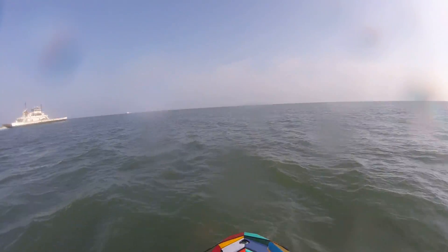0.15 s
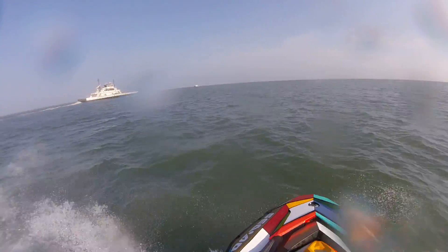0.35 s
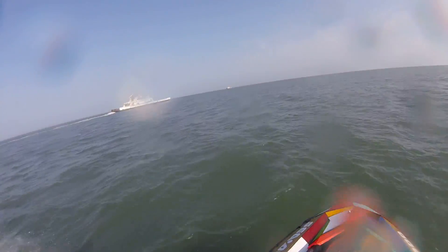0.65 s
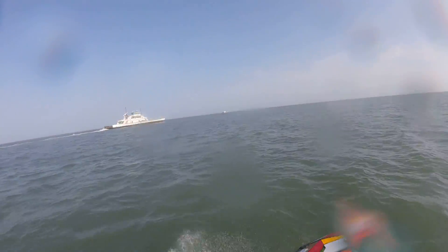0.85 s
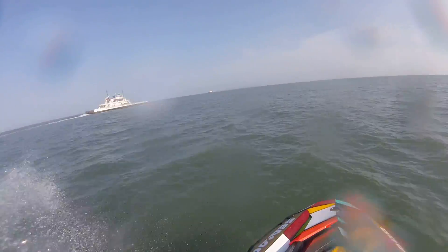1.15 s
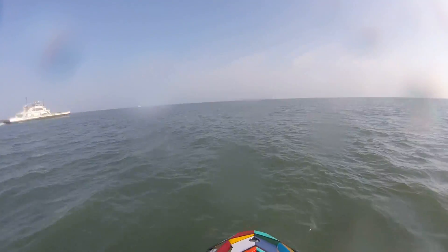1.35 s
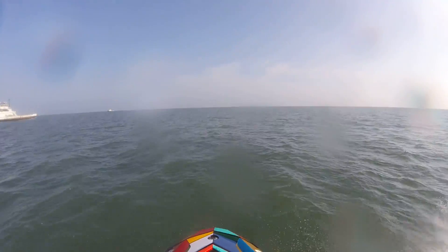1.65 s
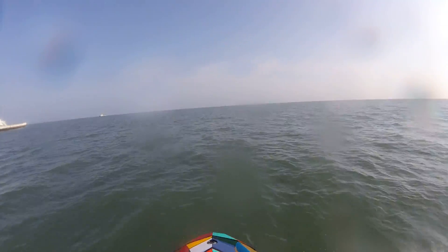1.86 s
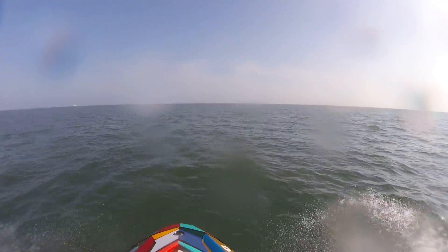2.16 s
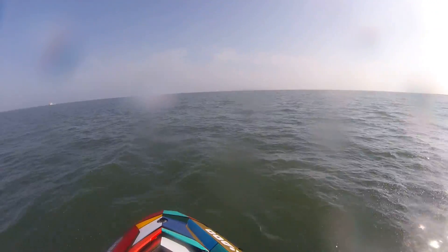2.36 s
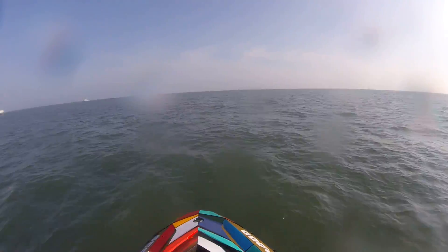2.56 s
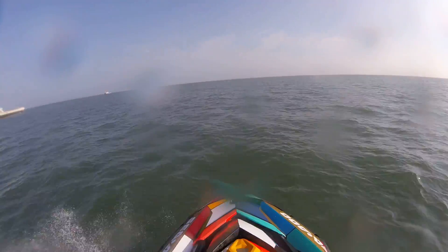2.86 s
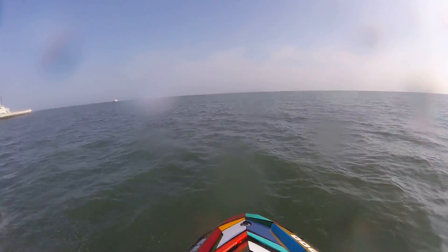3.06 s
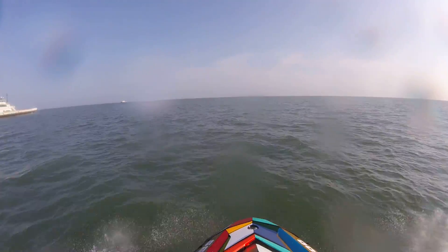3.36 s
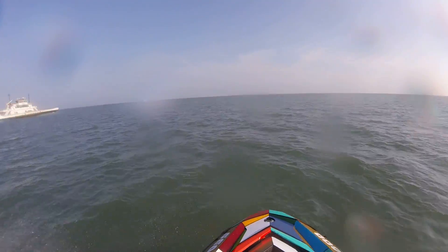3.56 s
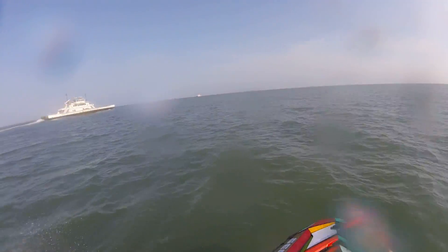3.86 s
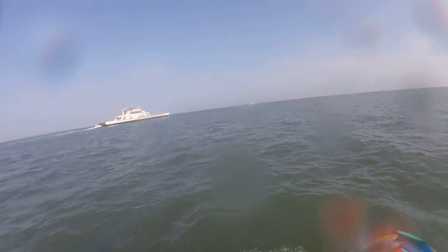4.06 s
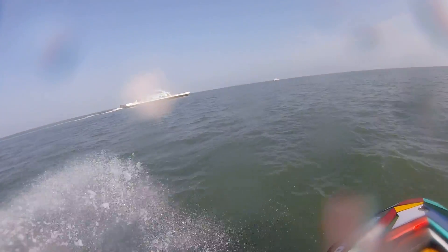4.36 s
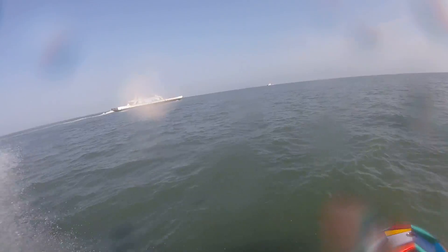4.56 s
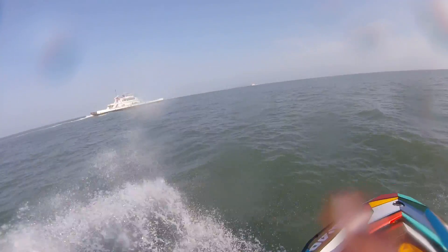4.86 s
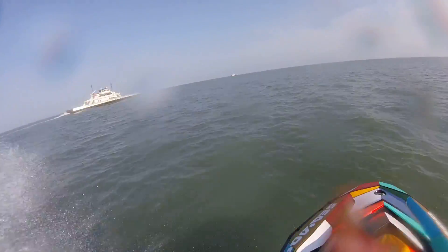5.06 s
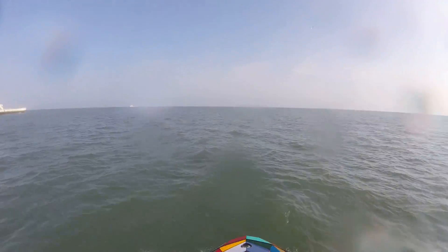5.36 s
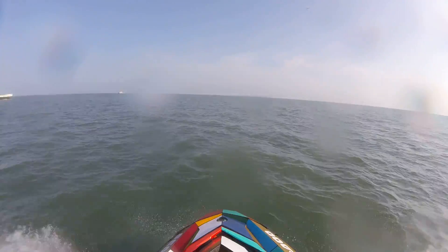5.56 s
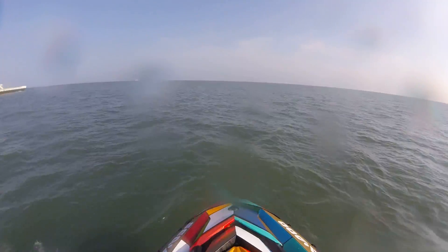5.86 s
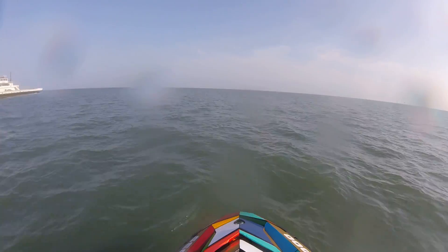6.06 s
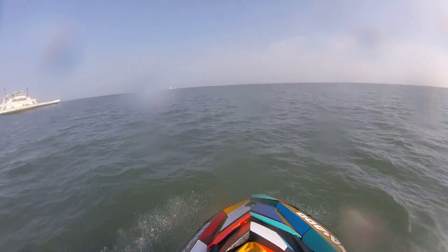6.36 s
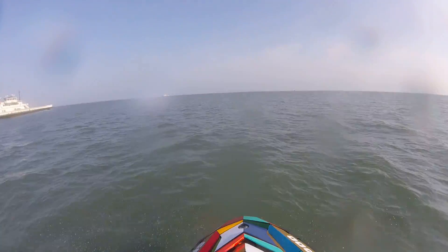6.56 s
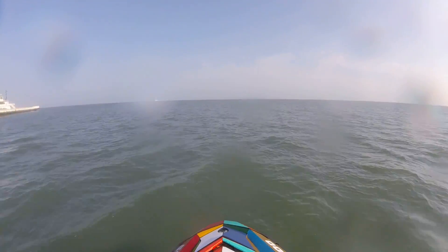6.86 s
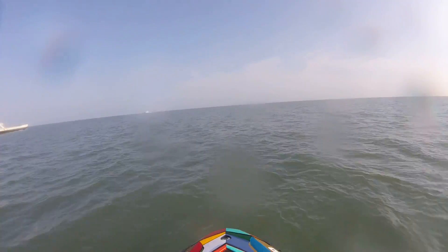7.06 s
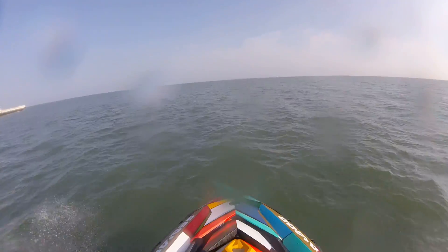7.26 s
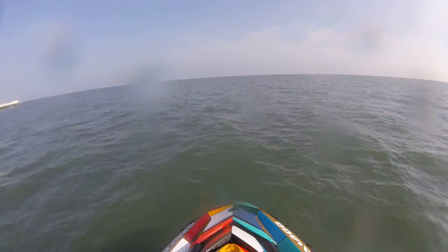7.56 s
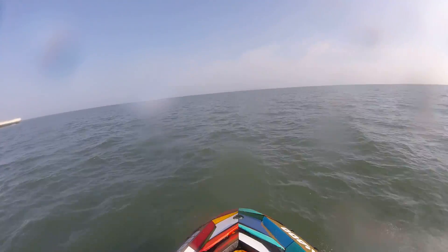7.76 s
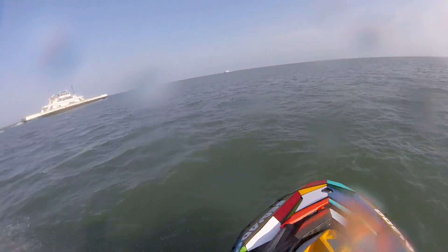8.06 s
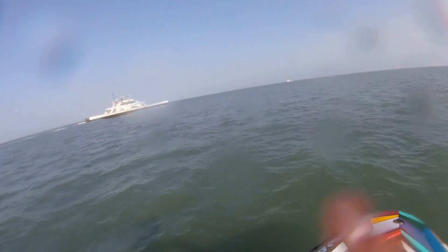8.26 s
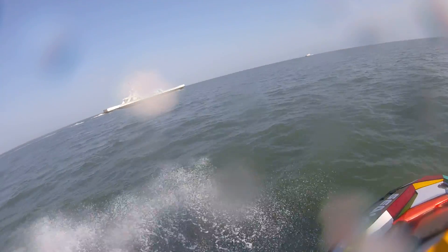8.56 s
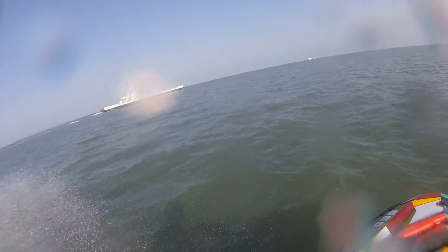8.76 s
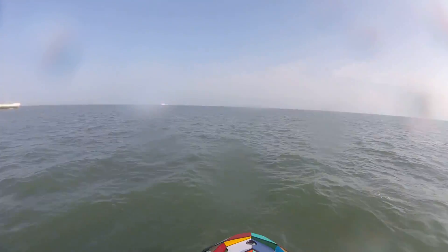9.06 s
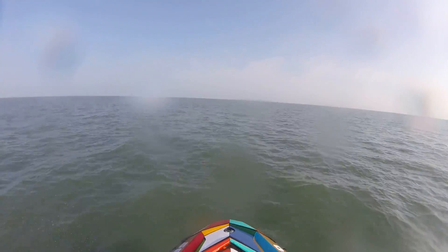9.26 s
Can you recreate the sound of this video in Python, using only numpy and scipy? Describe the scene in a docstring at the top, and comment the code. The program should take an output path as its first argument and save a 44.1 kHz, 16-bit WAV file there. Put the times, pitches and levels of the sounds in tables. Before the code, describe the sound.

A jet ski engine hums steadily across choppy water, with hissing spray, dull wave slaps and wind buffeting the microphone.

```python
"""A small jet boat crosses choppy water, heard from inside a sealed case whose cavity rings in the treble.
From the start a three-cylinder four-stroke engine hums through the rumbling hull, spray hisses and wind
buffets the case, flapping most in the first 1.6 s. At 4.7 s a wave slaps the hull; the engine then
speeds up to a peak at 7.5 s, through sheets of spray and a second slap at 6.3 s. It eases a little,
another sheet passes at 8.5 s, and a last, softer wave hits at 9 s."""
import sys
import numpy as np
from scipy import signal
from scipy.io import wavfile

SR = 44100
rng = np.random.default_rng(int(sys.argv[2]) if len(sys.argv) > 2 else 0)


def unload_audio(sound):
    """Save the sound as a 16-bit wav file, at the path given as the first command line argument."""
    columns = np.transpose(np.atleast_2d(sound))
    # keep every value between -1 and 1, then stretch to whole-number steps
    steps = np.round(np.clip(columns, -1, 1) * 32767)
    wavfile.write(sys.argv[1], SR, steps.astype(np.int16))


N = 415422

# Each row: time in seconds, four-stroke cycle rate in Hz, crank shake in dB, firing tone in dB,
# lift of the drone near 250 Hz in dB.
ENGINE_RUN = [(.05, 41.84, -37, -49, 1), (.12, 42.16, -30.5, -18, 2), (.27, 41.23, -48, -39, -4),
              (.39, 42.17, -27, -20, -1), (.46, 44.3, -34, -25.5, 0), (.71, 44.54, -26.5, -31.5, -1.5),
              (1.13, 44.44, -34, -29.5, 0), (1.42, 44.3, -24, -37, -0.5), (1.58, 43.02, -33, -34, -7),
              (1.78, 42.34, -24.5, -40, -1), (2.02, 42.93, -42, -37, -7), (2.28, 42.74, -30, -24, -4),
              (2.7, 42.93, -35, -35, 0.5), (3.1, 43.12, -25, -44, -1), (3.33, 43.63, -25.5, -23.5, -0.5),
              (3.67, 42.42, -33, -33, -1), (4.1, 43.17, -28, -27, -1), (4.25, 42.2, -30, -25.5, 3.5),
              (4.6, 42.28, -27.5, -24, -1), (4.75, 43, -30, -21, -1), (4.9, 43.76, -18, -20, 6),
              (5.09, 45.54, -21, -27.5, 0.5), (5.4, 45.65, -27, -26, 0.5), (5.58, 45.5, -23.5, -27, 0),
              (5.75, 45.6, -21, -27, 2), (6.1, 47.2, -20.5, -31, 1), (6.4, 46.51, -21, -29, -0.5),
              (6.51, 47.15, -23, -31, -3.5), (6.59, 48.3, -23, -31, -6), (6.72, 49.51, -22, -22.5, 6),
              (6.98, 48.88, -23.5, -21.5, 1), (7.5, 50.37, -21, -20.5, 5), (7.85, 49.7, -20.5, -22, 2.5),
              (8.22, 49.2, -22.5, -22.5, 2.5), (8.5, 48.1, -21, -29, -0.5), (9.0, 48.17, -21.5, -25.5, 1),
              (9.35, 47.8, -23, -26, 1)]
# Crank shake booming through the hull. Each row: peak time in seconds, lift in dB, rise and decay in s.
CRANK_BOOMS = [(.12, 16, 0.068, .06), (.39, 14, 0.03, .04), (.76, 11, 0.05, 0.13), (1.44, 3.5, 0.12, 0.052),
               (2.28, 8.5, 0.078, 0.034), (2.65, 10, .05, 0.052), (4.62, 14.5, 0.078, 0.075),
               (5.01, -7, .04, 0.035), (5.27, 16, 0.078, 0.091), (5.98, 1, 0.044, .05),
               (6.32, 1.5, 0.048, .05), (6.58, 11.5, 0.043, 0.053), (8.2, 9, 0.057, 0.028),
               (8.61, 3.5, 0.048, 0.057)]
# Exhaust hum near 180 Hz. Each row: time in seconds, level of order 4 in dB.
EXHAUST_HUM = [(0, -47), (.45, -29), (.6, -22), (.75, -39), (1.2, -27.5), (1.6, -42), (4.5, -36.5),
               (5.2, -24), (5.6, -31.5), (6.5, -34.5), (7.1, -33), (7.7, -33.5), (8.2, -28.5), (8.8, -26.5),
               (9.4, -36)]
# Slow, middle and fast cycle rate in Hz.
DRONE_RATES_HZ = [43, 46, 50]
# Drone over hull and exhaust resonances. Each row: order, level in dB at each of those three rates.
DRONE_ORDERS = [(5, -27.5, -27.5, -28), (6, -30, -32.5, -39.5)]
# Fading overtones. Each row: time in seconds, levels of orders 8, 9, 10 and 12 in dB.
OVERTONES = [(0.1, -40, -40, -35, -43), (0.4, -48, -50, -34.0, -41), (0.7, -46, -41, -42.5, -46),
             (1.0, -46.0, -41, -34.5, -52), (1.3, -41, -41, -40, -46), (1.6, -42, -55, -39.5, -46),
             (1.9, -53, -45, -38, -48), (2.2, -35, -47, -37.5, -43), (2.5, -55, -42, -41, -51),
             (2.8, -47, -55.0, -42, -45), (3.1, -42, -46, -36.5, -42), (3.4, -48.0, -40, -38, -44),
             (3.7, -42, -51, -37, -42), (4.0, -43, -52, -39.5, -44), (4.3, -38, -50, -34, -46.0),
             (4.6, -38, -45.0, -43.0, -53), (4.9, -58, -47, -40, -41), (5.2, -35, -35, -44, -39),
             (5.5, -35, -31, -36, -51), (5.8, -28, -40, -38.5, -40), (6.1, -37.5, -35, -40, -46),
             (6.4, -37.5, -34, -42.0, -44), (6.7, -34, -35.5, -41, -43), (7.0, -38, -38, -38, -53),
             (7.3, -30.5, -30.5, -42, -39), (7.6, -32, -35, -40, -45), (7.9, -36, -32, -34.5, -46),
             (8.2, -37.5, -38.5, -39, -45), (8.5, -38.5, -36, -47, -56), (8.8, -35.5, -41, -52.0, -45.5),
             (9.1, -43.5, -40, -47, -50), (9.4, -40, -37, -41, -39)]
# Thin growl at 550-700 Hz. Each row: time in seconds, levels of orders 15 and 13 in dB.
GROWL_LEVELS = [(0, -50, -52), (.4, -40, -52), (.7, -53, -53), (1.13, -41, -58), (1.5, -55, -47),
                (2.1, -57, -58), (2.24, -39, -56), (2.5, -46.5, -53), (2.75, -41, -56), (2.95, -43, -52),
                (3.17, -44, -54), (3.38, -45.5, -58), (3.55, -40, -52), (3.75, -45, -50), (3.95, -43, -49),
                (4.2, -62, -55), (5.0, -39, -47), (5.3, -60, -51), (5.85, -39, -40), (6.2, -54, -43),
                (6.45, -46, -40), (6.7, -55, -50), (7.5, -60, -44), (8.6, -48, -65), (9.4, -54, -41)]
# Weak steady buzz. Each row: order, level in dB.
BUZZ_ORDERS = [(1, -36), (7, -47), (11, -52), (14, -51), (16, -55), (18, -59.5)]
# Air past the case, water under the hull. Each row: time in seconds, wind in dB, rumble in dB.
FLOW_LEVELS = [(0, -17, -25.5), (.4, -25, -24), (.62, -17.5, -28.5), (.8, -21, -25.5), (.9, -24, -24.5),
               (.96, -21, -24.5), (1.17, -24.5, -29.5), (1.55, -24, -27), (2, -26, -29.5),
               (2.3, -30.5, -26), (2.6, -29.5, -28), (2.89, -24.5, -26), (3.12, -31, -26),
               (3.22, -24, -21.5), (3.36, -23.5, -27.5), (3.52, -33, -29.5), (3.85, -35, -26.5),
               (4, -25.5, -26.5), (4.4, -27.5, -27), (4.6, -24.5, -25), (4.75, -27, -22.5),
               (5.1, -38, -24.5), (5.45, -24, -23.5), (6.2, -21.5, -23), (6.48, -21, -28), (6.7, -25, -23),
               (7.2, -21, -22.5), (7.6, -23.5, -25), (8.2, -26.5, -25.5), (8.55, -26, -23.5),
               (8.7, -30, -24), (8.85, -23, -26), (9, -19.5, -24.5), (9.42, -23, -25.5)]
# Hull rumble. Each row: frequency in Hz, relative density in dB.
RUMBLE_SPECTRUM = [(47, -15), (80, 2.5), (172, -5.5), (232, -6.5), (305, -9.5), (431, -10), (559, -20),
                   (655, -16), (953, -24), (2500, -42), (3250, -67), (5500, -120)]
# Wind on the case. Each row: frequency in Hz, relative density in dB.
WIND_SPECTRUM = [(8.8, -40), (15, 1), (42, 5), (70, 0), (110, -2.5), (166, -2.5), (228, -7), (271, -13.5),
                 (300, -9), (390, -41.5), (660, -120)]
# Gusts and lulls. Each row: peak time in seconds, lift in dB.
WIND_GUSTS = [(.06, -3.5), (.85, 7), (1.31, 3), (1.52, 3.5), (1.65, 5.5), (2.25, 9.5), (2.46, 8),
              (2.68, 11), (2.97, 3), (3.4, 7), (3.97, 6.5), (4.04, 7), (4.9, 7), (5.2, 8), (5.38, 10.5),
              (7.4, -4), (7.53, -5), (7.87, 5), (8.26, 8), (8.79, 6)]
# Pressure swings on the case. Each row: centre in seconds, envelope peak in dB, pitch in Hz.
WIND_FLAPS = [(.31, -14, 35), (.48, -10, 85), (.505, -11, 55), (.585, -9.5, 110), (.65, -15, 35),
              (.69, -11, 50), (.75, -13, 30), (.8, -10, 100), (.845, -8.5, 38), (.94, -12, 45),
              (.985, -13, 45.03), (1.021, -15, 110), (1.499, -14, 70), (1.525, -13, 35),
              (1.604, -10, 110.1), (2.46, -14, 90), (2.68, -11, 60), (2.96, -15, 50), (3.39, -16, 44.96),
              (4.01, -20, 45), (4.65, -15, 45), (5.25, -17, 45), (5.37, -17, 50), (7.09, -13, 45),
              (8.26, -15, 44.94), (8.75, -19, 44.97)]
# Waves on the hull. Each row: start in seconds, strength in dB.
WAVE_HITS = [(4.651, -20.5), (6.306, -22.5), (8.957, -28)]
# Each row: frequency in Hz, gain in dB, T60 in seconds.
HULL_MODES = [(532, 2, 0.043), (608, 0.5, 0.055), (647, -13, 0.04)]
# Spray hiss. Each row: frequency in Hz, relative density in dB.
SPRAY_SPECTRUM = [(500, -2), (1000, -1), (2000, -6), (3200, -7), (4900, -10), (5700, -8.5), (7500, -14),
                  (9300, -14.5), (11200, -25.5), (12000, -43), (14000, -57.5)]
# Steady spray along the hull. Each row: time in seconds, level in dB, tilt in dB per octave.
SPRAY_WASH = [(0, -43.5, 1), (.55, -42.5, 1.5), (.72, -42, 0), (.88, -43.5, 0), (1.1, -43.5, -0.5),
              (1.5, -42, -2.5), (1.62, -47.5, 0.5), (1.9, -47.5, 1.5), (2.1, -42, 0), (2.55, -44.5, 0.5),
              (3.4, -43, 0), (3.62, -45.5, -2), (4.0, -41.5, -0.5), (4.45, -41, -1), (4.56, -41, -2),
              (4.62, -42, -1), (5, -39.5, 0.5), (5.3, -41, -1.5), (6, -40, -0.5), (6.42, -41.5, -2),
              (6.53, -44.5, -1), (6.66, -42, -1), (6.85, -40.5, -2), (7.3, -40.5, -0.5), (7.5, -42.5, -1),
              (7.9, -42, -2), (8.1, -44, -3.5), (8.3, -46, -3), (8.8, -44, -3), (9.2, -41, -2.5),
              (9.42, -44, -1.5)]
# Sheets and splashes from the bow. Each row: peak time in seconds, lift in dB, rise and decay in s,
# added tilt in dB per octave.
BOW_SPLASHES = [(.25, 1, .05, 0.061, -2), (.38, 7, 0.17, 0.064, -0.5), (.782, 7, .003, 0.016, -1),
                (.99, 4, 0.027, 0.085, -0.5), (1.5455, 10, 0.0015, 0.003, -2.5), (2.7, 5, 0.11, 0.37, -0.5),
                (3.44, 3, 0.01693, 0.055, -1), (4.27, 4, 0.27, 0.086, .3),
                (4.648, 6.5, 0.0029, 0.0205, -0.5), (4.5, 2, 0.03, .04, 1.5), (4.82, 7.5, 0.11, 0.072, 0.5),
                (5.5, 8.5, 0.055, 0.15, 1.7), (5.72, -0.5, .06, .07, 2), (6.22, 5, 0.051, 0.17, 0.5),
                (7.12, 3, 0.011, .02, -3.5), (7.225, 4, 0.003, 0.031, -3), (7.756, 5, .003, 0.017, 1),
                (7.782, 3, 0.0041, 0.025, -2.5), (8.5, 10.5, 0.15, 0.17, 2), (8.73, 3, .06, .04, 1),
                (9.019, 2.5, 0.0033, 0.017, 0), (9.225, 3, 0.00299, 0.014, -1)]
# Sizzle above 8 kHz. Each row: time in seconds, lift in dB at 10 kHz.
SPRAY_SIZZLE = [(0, -3), (.45, 0), (1.0, 1.5), (1.5, -0.5), (2.0, -2), (3.0, -3), (3.6, 1), (4.0, 1.5),
                (4.5, 3), (4.82, 0.5), (5.3, 0.5), (5.7, 0.5), (6.2, 0.5), (6.8, -2), (7.5, -1), (8.2, 1.5),
                (8.43, 4), (8.7, 3), (9.4, 1)]
# Hiss near 3 kHz swelling and hollowing between waves. Each row: time in seconds, lift in dB.
SPRAY_MIDS = [(0, 1), (.25, 0.5), (.55, 0), (.9, 0), (1.3, -0.5), (1.8, 0.5), (2.3, -0.5), (2.75, 1),
              (3.3, 0.5), (3.9, -1.5), (4.2, 0), (4.5, -2.5), (4.8, 0.5), (5.15, -1.5), (5.5, 0), (6.0, 0),
              (6.6, -0.5), (7.2, 1), (7.8, 0), (8.2, 0), (8.55, -1.5), (9.0, 0.5), (9.4, 0)]
# Drops on the case. Each row: start in seconds, level in dB, pitch in Hz, T60 in seconds.
DROP_HITS = [(.7815, -33, 7000, .002), (1.5372, -40, 9500, .0015), (1.5455, -33, 9500, .001),
             (5.0103, -27, 6000, .006), (5.4241, -31, 6300, .004), (7.7555, -34, 3000, .003),
             (8.2155, -34, 4012, 0.0031)]
# Air gaps in front of the microphone. Each row: centre in Hz, width in Hz, lift in dB.
CAVITY_MODES = [(4020, 920, -2), (4820, 880, 3), (6503, 373, 10.5), (10050, 1900, -10)]


def engine(phase_rad, cycle_hz, shake_db, firing_db, drone_db):
    """Two crank turns (order 2) and three firings (order 3) a cycle; uneven cylinders add the rest."""
    low = [(2, shake_db + swells(CRANK_BOOMS)), (3, firing_db), (4, *curves(EXHAUST_HUM))]
    drone = [(k, drone_db + np.interp(cycle_hz, DRONE_RATES_HZ, db)) for k, *db in DRONE_ORDERS]
    upper = zip([8, 9, 10, 12, 15, 13], curves(OVERTONES) + curves(GROWL_LEVELS))
    return (orders(phase_rad, low, waver_db=1.5, waver_rad=0.46)
            + orders(phase_rad, drone, waver_db=1.3, waver_rad=0.26)
            + orders(phase_rad, upper, waver_db=1.74, waver_rad=0.59)
            + orders(phase_rad, BUZZ_ORDERS, waver_db=3.0, waver_rad=1.0))


def orders(phase_rad, rows, waver_db, waver_rad):
    """Sines on multiples of the cycle rate, rms 1 at 0 dB, wavering in level and phase."""
    out = 0
    for order, db in rows:
        gain = np.sqrt(2) * from_db(db + waver_db * (drift(6.4) + 0.63 * drift(19)))
        out += gain * np.cos(order * phase_rad + rng.uniform(-2.14, 1.72) + waver_rad * drift(3.2))
    return out


def hull_rumble(level_db, phase_rad, puff_db=1.0):
    """Water rushing under the hull and exhaust puffs, swelling once an engine cycle."""
    noise = banded(rng.standard_normal((2, N)), RUMBLE_SPECTRUM, flicker_db=0.84, flicker_hz=5.4)
    return from_db(level_db + puff_db * np.cos(phase_rad)) * noise


def wind(level_db, gust_s=0.057, lumps_db=2.2, lumps_hz=21):
    """Air buffets the case: lumpy low noise, lifted briefly by gusts."""
    gust_db = swells([(s, db, gust_s, gust_s) for s, db in WIND_GUSTS]) + lumps_db * drift(lumps_hz)
    noise = banded(rng.standard_normal((2, N)), WIND_SPECTRUM, flicker_db=0.8, flicker_hz=15)
    return from_db(level_db + gust_db) * noise


def wind_flaps(half_width_cycles=0.52):
    """Each flap is one short pressure swing at a random phase."""
    t = np.arange(N) / SR
    out = np.zeros(N)
    for s, db, hz in WIND_FLAPS:
        near = slice(round((s - .08) * SR), round((s + .08) * SR))
        cycles = hz * (t[near] - s)
        envelope = from_db(db) * np.exp(-(cycles / half_width_cycles) ** 2)
        out[near] += envelope * np.cos(2 * np.pi * cycles + rng.uniform(0, 2 * np.pi))
    return out


def wave_slaps(cutoff_hz=1100):
    """Waves ring the hull modes; water is a soft blow, so the top is dull."""
    starts = [round(s * SR) for s, _ in WAVE_HITS]
    hit_db = np.array(WAVE_HITS)[:, 1]
    out = np.zeros(N)
    for hz, mode_db, t60_s in HULL_MODES:
        clicks = np.zeros(N)
        clicks[starts] = from_db(hit_db + mode_db + rng.normal(0, 1.4, len(starts)))
        out += ring(clicks, hz, t60_s)
    return signal.sosfilt(signal.butter(2, cutoff_hz, fs=SR, output="sos"), out)


def spray(ticks_per_s=400, tick_db=9.0):
    """Dense droplets: hiss with sharp ticks, more in heavy spray; splashes swell and die away."""
    level_db, tilt_db_oct = curves(SPRAY_WASH)
    level_db += swells([row[:4] for row in BOW_SPLASHES])
    tilt_db_oct += swells([(s, tilt, rise, decay) for s, _, rise, decay, tilt in BOW_SPLASHES])
    tick_chance = ticks_per_s * from_db(level_db - level_db.mean()) / SR
    ticks = (rng.random((2, N)) < tick_chance) * rng.standard_normal((2, N)) * from_db(tick_db)
    hiss = banded(rng.standard_normal((2, N)) + ticks, SPRAY_SPECTRUM, flicker_db=0.45, flicker_hz=22,
                  tilt_db_oct=tilt_db_oct, top_db=curves(SPRAY_SIZZLE)[0], mid_db=curves(SPRAY_MIDS)[0])
    return from_db(level_db) * hiss


def drops():
    """Single drops tick on the case, each ringing briefly at its own pitch."""
    out = np.zeros(N)
    for s, db, hz, t60_s in DROP_HITS:
        start = round(s * SR)
        click = from_db(db) * signal.unit_impulse(800)
        out[start:start + len(click)] += ring(click, hz, t60_s)
    return out


def banded(noises, spectrum, flicker_db, flicker_hz, tilt_db_oct=0, top_db=0, mid_db=0):
    """Flickering third-octave bands, cut alternately from two noises; rms near 1 before the lifts."""
    hz, db = np.transpose(spectrum)
    out, power = 0, 0
    common = drift(flicker_hz)
    edges_hz = hz[0] * 2 ** np.arange(0, np.log2(hz[-1] / hz[0]) + .3, 1 / 3)
    for k, (low, high) in enumerate(zip(edges_hz, edges_hz[1:])):
        centre_hz = np.sqrt(low * high)
        band = signal.sosfilt(signal.butter(2, [low, high], "band", fs=SR, output="sos"), noises[k % 2])
        band *= from_db(np.interp(np.log(centre_hz), np.log(hz), db))
        power += np.mean(band ** 2)
        lift_db = flicker_db * (1.04 * common + drift(flicker_hz))
        lift_db += tilt_db_oct * np.log2(centre_hz / 4000)
        lift_db += top_db * np.clip(2 * np.log2(centre_hz / 7000), 0, 2)
        lift_db += mid_db * np.exp(-(np.log2(centre_hz / 3200) / 0.6) ** 2)
        out += band * from_db(lift_db)
    return out / np.sqrt(power)


def ring(clicks, hz, t60_s):
    """One mode: a unit click starts a decaying sine of height 1."""
    r = from_db(-60 / (t60_s * SR))
    w = 2 * np.pi * hz / SR
    return signal.lfilter([0, np.sin(w)], [1, -2 * r * np.cos(w), r * r], clicks + 1e-18)


def drift(rate_hz, hop=40):
    """Slow random wander of rms 1: noise through two one-pole low-passes."""
    r = np.exp(-2 * np.pi * rate_hz * hop / SR)
    slow = signal.lfilter([1], [1, -2 * r, r * r], rng.standard_normal(N // hop + 2002))[2000:]
    slow /= np.sqrt(np.mean(slow ** 2))
    return np.interp(np.arange(N) / hop, np.arange(len(slow)), slow)


def swells(rows):
    """Sum in dB of lifts that rise and decay exponentially."""
    t = np.arange(0, N + 20, 20) / SR
    lift_db = sum(db * np.exp(-np.abs(t - s) / np.where(t < s, rise_s, decay_s))
                  for s, db, rise_s, decay_s in rows)
    return np.interp(np.arange(N) / SR, t, lift_db)


def curves(rows):
    """Columns of a timed table, interpolated to every sample."""
    times_s, *columns = np.transpose(rows)
    return [np.interp(np.arange(N) / SR, times_s, column) for column in columns]


def from_db(db):
    """Decibels to gain."""
    return 10 ** (np.asarray(db) / 20)


def case_cavity(x):
    """Each air gap lifts or dips its own band."""
    for hz, width_hz, db in CAVITY_MODES:
        r = np.exp(-np.pi * width_hz / SR)
        feedback = [1, -2 * r * np.cos(2 * np.pi * hz / SR), r * r]
        band = signal.lfilter(np.array([1, 0, -1]) * (1 - r * r) / 2, feedback, x)
        x = x + (from_db(db) - 1) * band
    return x


def scene():
    """Engine, hull, wind and spray, in mono."""
    cycle_hz, shake_db, firing_db, drone_db = curves(ENGINE_RUN)
    wind_db, rumble_db = curves(FLOW_LEVELS)
    phase_rad = 2 * np.pi * np.cumsum(cycle_hz) / SR
    tones = engine(phase_rad, cycle_hz, shake_db, firing_db, drone_db)
    water = hull_rumble(rumble_db, phase_rad) + wave_slaps() + spray() + drops()
    return (tones + water + wind(wind_db) + wind_flaps())[None]


def record(dry, rolloff_hz=11400, stopband_hz=12900):
    """Cavity colour, soft clipping, microphone roll-off, steep top cut."""
    rounded = 0.77 * np.tanh(case_cavity(dry) / 0.82)
    rolled = signal.sosfilt(signal.butter(8, rolloff_hz, fs=SR, output="sos"), rounded)
    return signal.sosfilt(signal.cheby2(18, 45, stopband_hz, fs=SR, output="sos"), rolled)


dry = scene()
out = record(dry)
unload_audio(out)
```